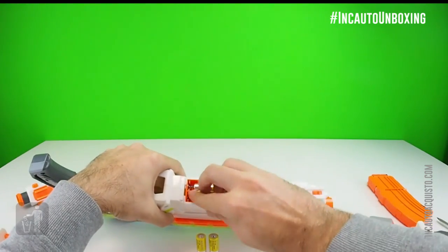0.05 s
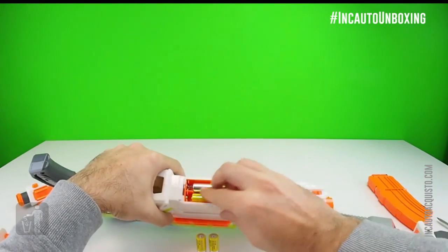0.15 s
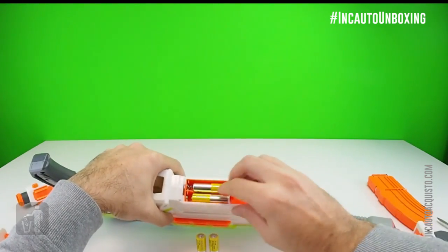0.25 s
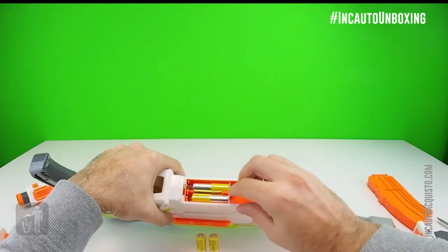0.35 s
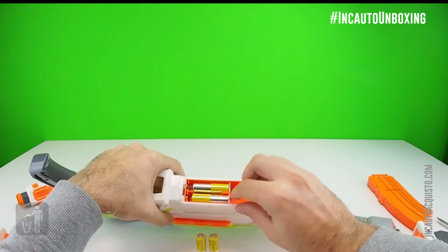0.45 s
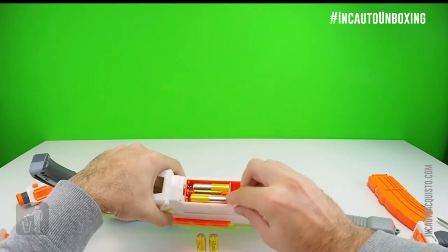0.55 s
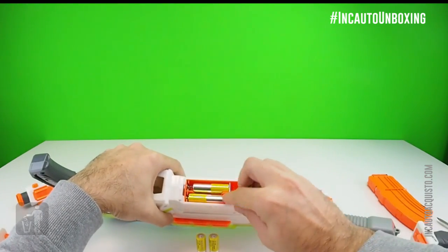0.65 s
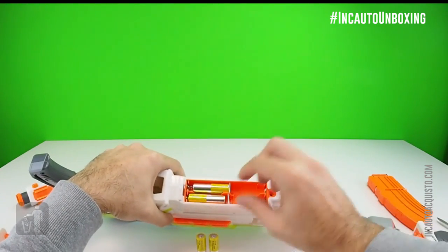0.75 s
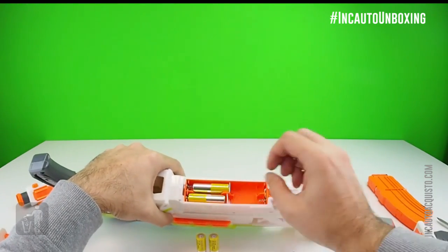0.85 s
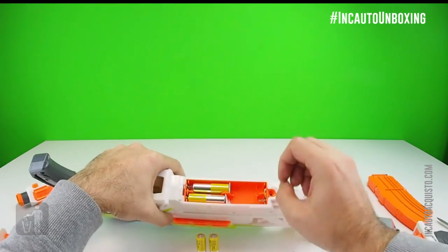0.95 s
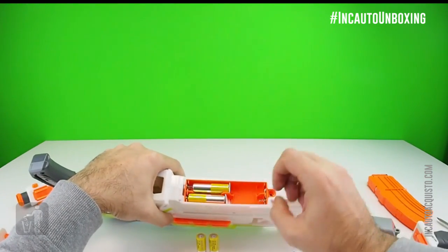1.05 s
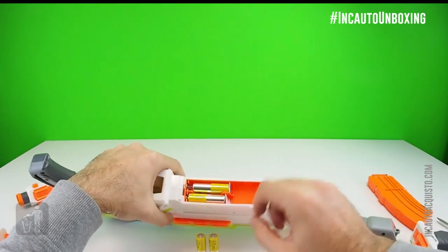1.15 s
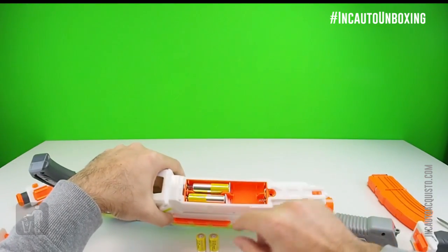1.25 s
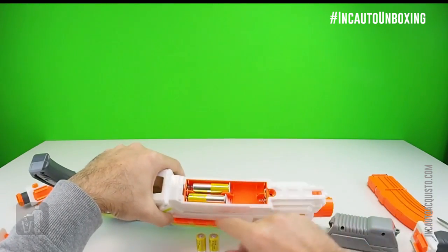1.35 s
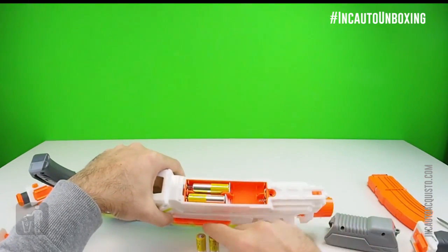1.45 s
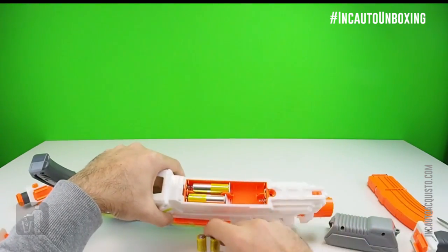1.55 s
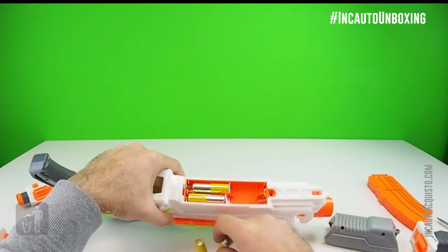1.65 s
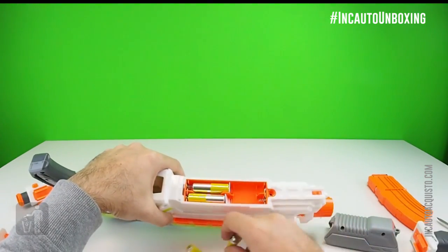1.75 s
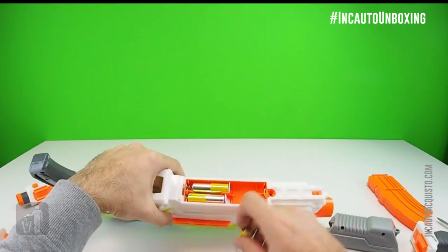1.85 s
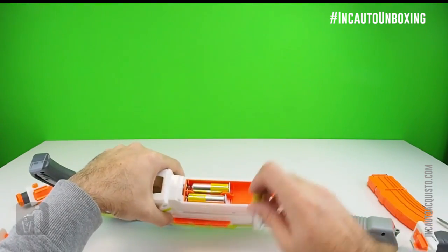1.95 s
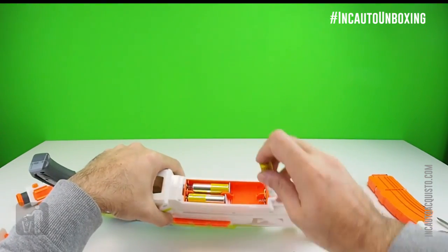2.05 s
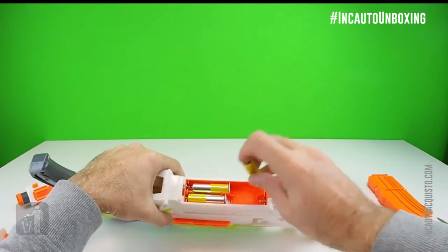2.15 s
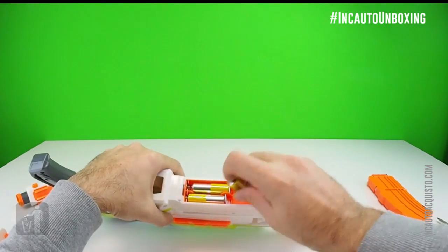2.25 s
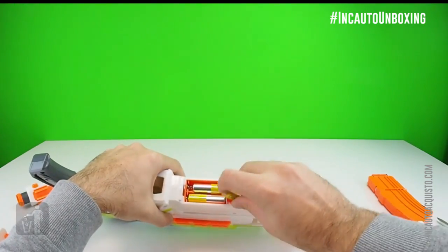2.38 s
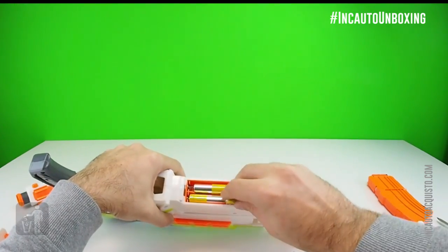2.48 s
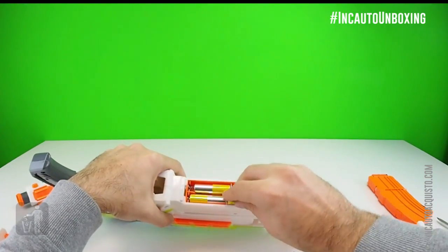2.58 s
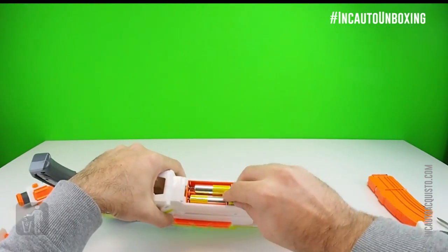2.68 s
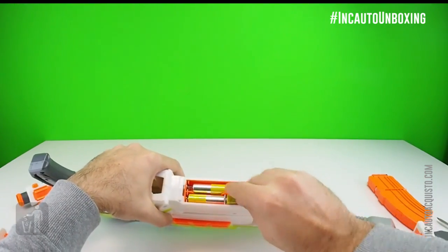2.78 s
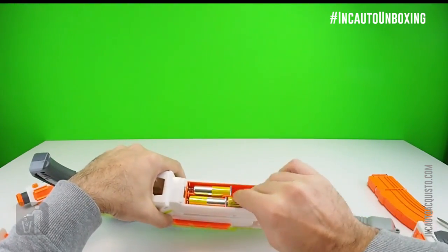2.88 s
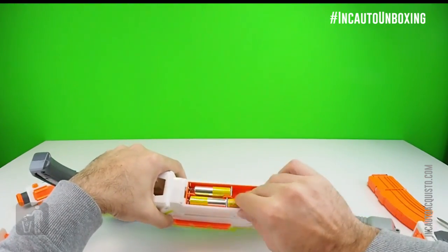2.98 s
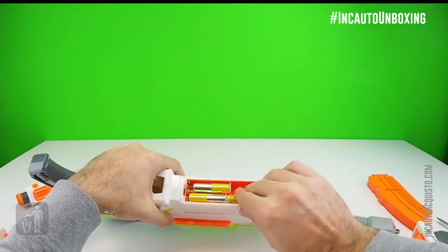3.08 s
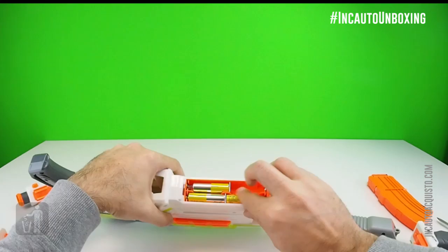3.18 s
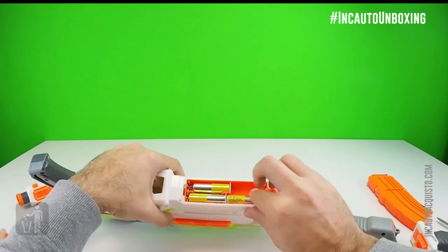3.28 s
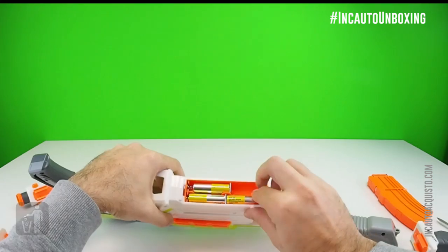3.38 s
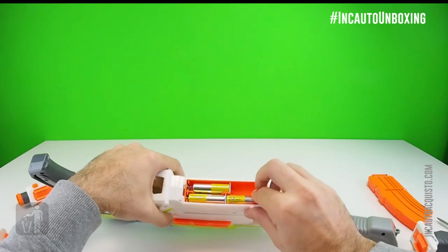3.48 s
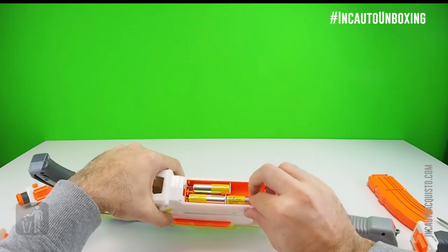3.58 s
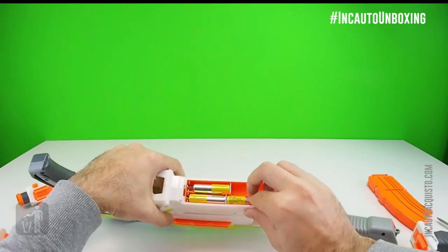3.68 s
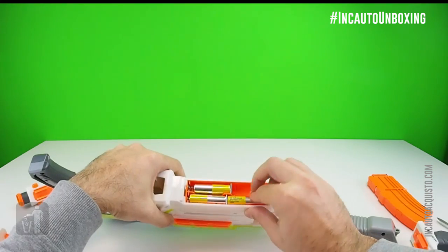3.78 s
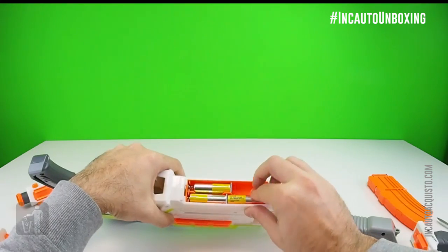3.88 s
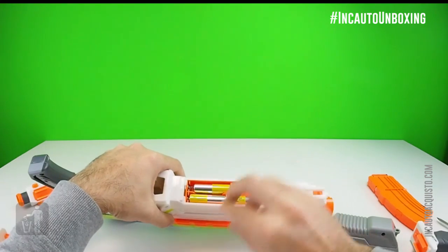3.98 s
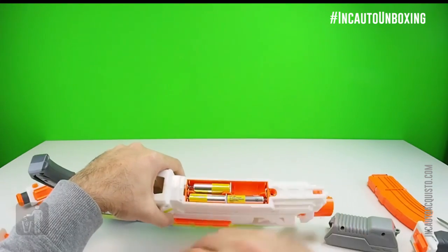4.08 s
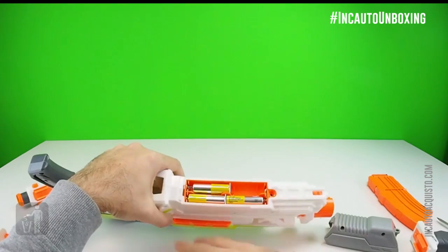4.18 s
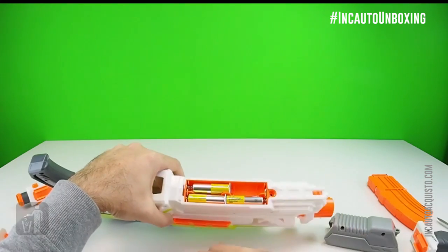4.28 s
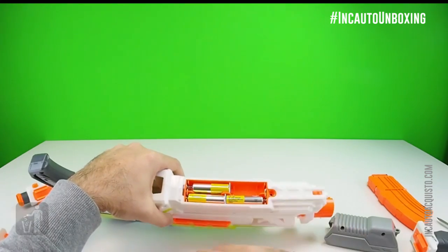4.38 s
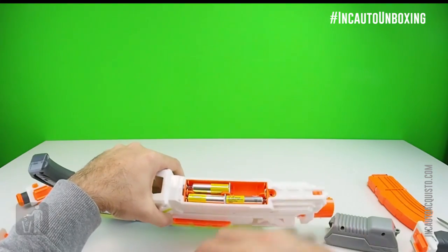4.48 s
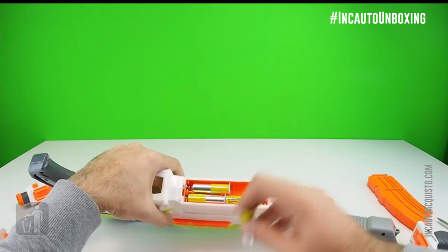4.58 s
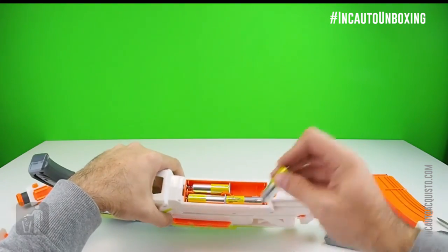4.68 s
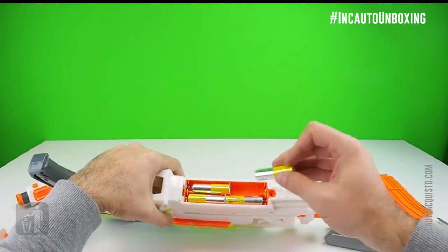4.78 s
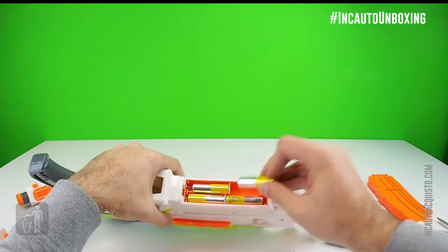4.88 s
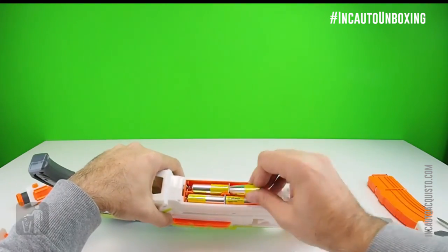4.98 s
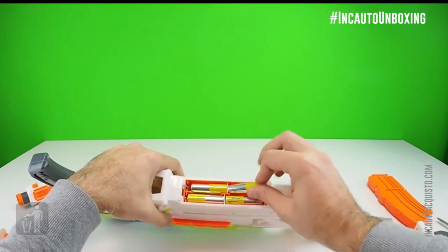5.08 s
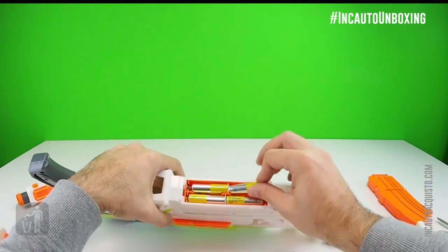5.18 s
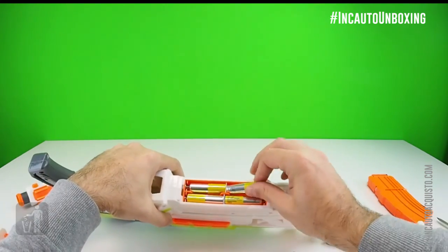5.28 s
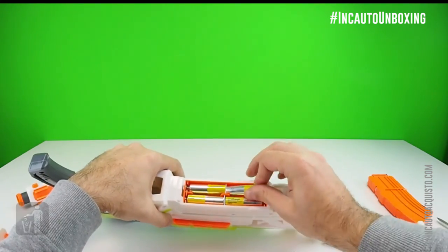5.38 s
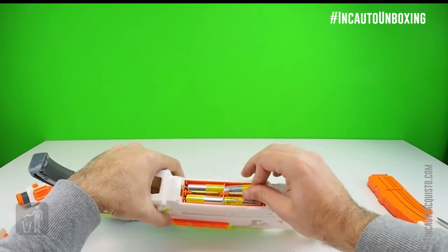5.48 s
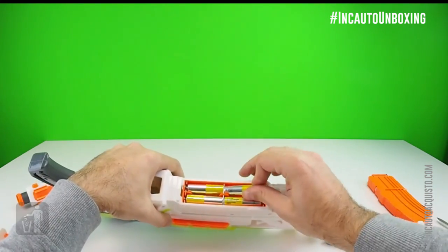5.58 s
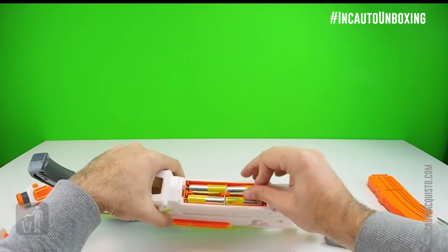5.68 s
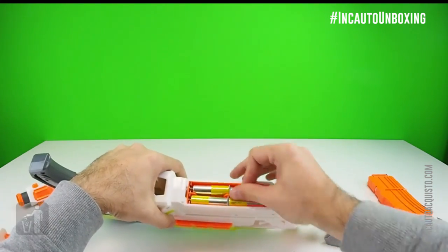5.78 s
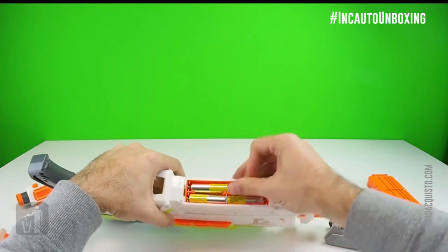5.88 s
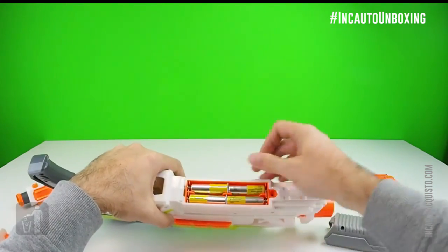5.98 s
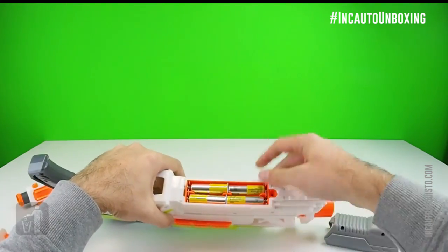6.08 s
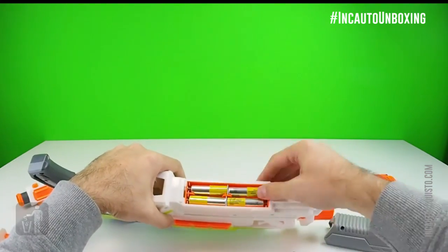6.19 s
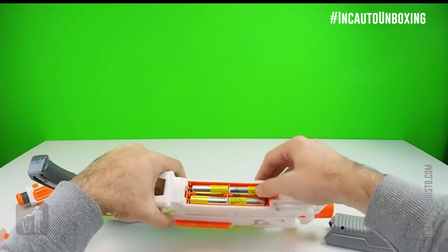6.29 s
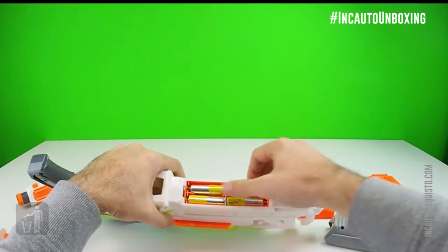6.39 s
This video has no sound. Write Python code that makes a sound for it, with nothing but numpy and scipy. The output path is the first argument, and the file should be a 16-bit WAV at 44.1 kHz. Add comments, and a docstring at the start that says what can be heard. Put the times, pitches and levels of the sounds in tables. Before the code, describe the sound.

Dry plastic clicks and clacks as batteries are pushed home against springs; one topples on the tabletop and bounces rapidly, over faint hiss.

```python
"""Ticks and knocks of batteries in a hollow plastic toy blaster are heard first, over a quiet hiss.
Scrapes are uneven friction noise; knocks and snaps ring damped shell modes, and each snap adds a coil spring.
Metal caps flick a contact plate; one battery topples on the table and bounces at shrinking intervals.
Hand bumps, drags and a brushing sleeve are shaped noise; a small room answers with a decaying diffuse tail."""
import sys
import numpy as np
from scipy import signal
from scipy.fft import rfft, irfft, next_fast_len
from scipy.io import wavfile

SR = 44100
rng = np.random.default_rng(int(sys.argv[2]) if len(sys.argv) > 2 else 0)


def inscribe(sig):
    """Save sig as 16-bit PCM at rate SR to the path in sys.argv[1].

    A 1-D sig is mono; a 2-D sig holds one channel per row.
    Samples are clipped to [-1, 1] before scaling.
    """
    pcm = np.round(np.clip(np.atleast_2d(sig).T, -1, 1) * 32767)
    wavfile.write(sys.argv[1], SR, pcm.astype(np.int16))


N = 284004
AGE = np.arange(SR // 3) / SR  # time since the start of a sound (s)


def amp(db):
    """Level law: decibels to amplitude gain."""
    return 10 ** (np.asarray(db) / 20)


def unit(x):
    """Power normalisation: scale to rms 1."""
    return x / np.sqrt(np.mean(x ** 2) + 1e-20)


def early(x):
    """Onset normalisation: scale a blow to rms 1 over its first hundredth of a second."""
    return x / np.sqrt(np.mean(x[:, :SR // 100] ** 2) + 1e-20)


def along(points, hz):
    """Logarithmic frequency scale: interpolate (Hz, value) points along it."""
    point_hz, values = np.transpose(points)
    return np.interp(np.log(hz + 1), np.log(point_hz), values)


def fade(t60):
    """Exponential damping: a fall of 60 dB in t60 seconds."""
    return np.exp(-np.log(1000) * AGE / t60)


def add(track, s, sound):
    """Superposition: mix a sound into a track at time s."""
    part = track[:, max(round(s * SR), 0):][:, :sound.shape[1]]
    part += sound[:, :part.shape[1]]


def coloured(x, spectrum):
    """Minimum-phase filtering: a causal filter with the gain of (Hz, dB) points."""
    size = 2 * next_fast_len(x.shape[-1] // 2 + 2048)
    log_gain = np.log(amp(along(spectrum, np.fft.rfftfreq(size, 1 / SR))))
    # folding the cepstrum onto positive times makes the filter causal
    cepstrum = irfft(log_gain)
    cepstrum[1:size // 2] *= 2
    cepstrum[size // 2 + 1:] = 0
    return irfft(rfft(x, size) * np.exp(rfft(cepstrum)), size)[..., :x.shape[-1]]


def noise(size, width):
    """Mid-side stereo: white noise whose width depends on frequency."""
    turn = np.arctan(amp(along(width, np.fft.rfftfreq(size, 1 / SR))))
    shares = [np.cos(turn), np.sin(turn)]
    mid, side = irfft(rfft(rng.standard_normal((2, size))) * shares, size)
    return np.array([mid + side, mid - side])


# stereo width of the contacts: frequency_hz, side_minus_mid_db
CONTACT_WIDTH = [(100, -23), (400, -27), (1200, -7), (2500, -9.5), (4500, -4.5), (12000, -0.5)]
SCATTER_DB = 2.5  # spread of the mode strengths from blow to blow


def ring(modes, spot_hz=None, spot_db=8, spot_width=.09):
    """Modal superposition: damped modes at new strengths; high ones reach the ears out of step."""
    hz, db, t60 = np.transpose(modes)[:, :, None]
    db = db + SCATTER_DB * rng.standard_normal(hz.shape)
    if spot_hz:
        # the struck spot favours nearby modes; the width is in log frequency
        db = db + spot_db * np.exp(-(np.log(hz / spot_hz) / spot_width) ** 2)
    polarity = rng.choice([-1, 1], hz.shape)
    skew = np.arctan(amp(along(CONTACT_WIDTH, hz))) * rng.choice([-1, 1], hz.shape)
    swing = polarity * amp(db) * fade(t60)
    phase = 2 * np.pi * hz * AGE
    return np.array([(swing * np.sin(phase + ear * skew)).sum(0) for ear in (1, -1)])


def wash(spectrum, crack_t60, body_t60, body_db, bright_t60):
    """High modal density: a brief crack, then noise for crowded modes whose treble dies first."""
    crack = noise(len(AGE), CONTACT_WIDTH) * fade(crack_t60)
    body = noise(len(AGE), CONTACT_WIDTH)
    dull = signal.sosfilt(signal.butter(2, 2000, fs=SR, output="sos"), body)
    bright = signal.sosfilt(signal.butter(2, 2000, "high", fs=SR, output="sos"), body)
    # subtracting keeps the two halves in phase where they cross
    decaying = dull * fade(body_t60) - bright * fade(bright_t60)
    return early(coloured(crack + amp(body_db) * decaying, spectrum))


# frequency registers of a blow, from knock and clack to click and tick: low_hz, high_hz
REGISTERS_HZ = [(30, 750), (750, 2300), (2300, 6000), (6000, 15500)]


def voiced(blow, levels_db):
    """Spectral balance: each register of a blow is set to its own onset level."""
    out = 0
    for edges, db in zip(REGISTERS_HZ, levels_db):
        band_filter = signal.butter(N=4, Wn=edges, btype="band", fs=SR, output="sos")
        out = out + amp(db) * early(signal.sosfilt(band_filter, blow))
    return out


# spectrum of the quiet hiss: frequency_hz, relative_level_db (per Hz)
HISS_SPECTRUM = [(25, -4), (95, 0.5), (250, -1.5), (700, -7.5), (1150, -5), (1400, -10), (1650, -5.5),
                 (2200, -16), (3200, -12.5), (4800, -15), (6800, -23), (9200, -17), (11000, -21),
                 (15500, -25)]
# stereo width of the hiss: frequency_hz, side_minus_mid_db
HISS_WIDTH = [(60, -7.5), (180, -3), (550, -5.5), (1650, -1.5), (4970, 0.5), (15000, -0.5)]
HISS_DB = -54  # rms level before the ears are made unequal


def room_hiss():
    """Stationary random noise: steady room and microphone hiss, 1 dB stronger on the left."""
    hiss = amp(HISS_DB) * unit(coloured(noise(N, HISS_WIDTH), HISS_SPECTRUM))
    return hiss * amp([[.5], [-.5]])


# reverberation of the small room: frequency_hz, t60_s
ROOM_DECAY = [(150, 0.385), (500, 0.49), (2000, 0.31), (5000, 0.27), (13000, 0.19)]


def room(x):
    """Diffuse reverberation: decaying noise tails answer from the walls, different at each ear."""
    hz, t, z = signal.stft(rng.standard_normal((2, SR // 2)), SR, nperseg=256)
    decay = np.exp(-np.log(1000) * t / along(ROOM_DECAY, hz)[:, None])
    tail = signal.istft(z * decay, SR, nperseg=256)[1]
    # the answer starts 5 ms after the direct sound
    tail = np.pad(tail / np.linalg.norm(tail[0]), ((0, 0), (SR // 200, 0)))
    mid, spread = signal.fftconvolve(x, tail, axes=1)[:, :N]
    # long waves arrive alike at the two close capsules
    side = coloured(spread, [(300, -23.5), (1000, -6.5), (3000, 1.5)])
    return np.array([mid + side, mid - side]) / np.sqrt(2)


# soft bumps of a hand through the table: start_s, peak_db (direct sound)
HAND_BUMPS = [(3.084, -43), (4.295, -39.5), (4.345, -60)]


def bumps():
    """Low-frequency excitation: a soft hand makes the table boom briefly."""
    out = np.zeros((2, N))
    for s, db in HAND_BUMPS:
        push = noise(len(AGE), CONTACT_WIDTH) * fade(0.21) * (1 - fade(0.022))
        boom = coloured(push, [(20, -27), (60, 7.0), (110, -12.0), (230, -11.5), (400, -26), (1500, -49.0)])
        add(out, s, amp(db) * boom / np.abs(boom).max())
    return out


def friction(strokes, spectrum, grain_db):
    """Stick-slip friction: tiny slips, made uneven by grain_db, swell and fade under each stroke."""
    out = np.zeros((2, N))
    for s, length, db in strokes:
        # each slip strength lasts 64 samples
        slip_sizes = np.repeat(rng.standard_normal(len(AGE)), repeats=64)[:len(AGE)]
        slips = unit(amp(grain_db * slip_sizes))
        stroke = np.sin(np.pi * np.minimum(AGE / length, 1))
        rubbing = unit(coloured(noise(len(AGE), CONTACT_WIDTH) * slips, spectrum))
        add(out, s, amp(db) * stroke * rubbing)
    return out


# sleeve brushing the table: start_s, length_s, level_db (before the swell)
SLEEVE_STROKES = [(1.55, 0.15, -59), (1.68, 0.06, -52), (1.815, 0.062, -53)]
# spectrum of the sleeve: frequency_hz, relative_level_db (per Hz)
SLEEVE_SPECTRUM = [(40, -4.5), (150, 4), (270, 10), (450, 4), (1500, -6), (6000, -42)]


def sleeve_brushes():
    """Soft friction: a sleeve on the table gives noise with little treble."""
    return friction(SLEEVE_STROKES, SLEEVE_SPECTRUM, grain_db=3)


# battery dragged over the table: start_s, length_s, level_db (before the swell)
DRAG_STROKES = [(1.825, 0.041, -51), (4.295, 0.039, -48), (4.332, 0.059, -37.5), (4.37, 0.043, -48)]
# spectrum of the drags: frequency_hz, relative_level_db (per Hz)
DRAG_SPECTRUM = [(50, -32), (450, -2.5), (800, -4.5), (1030, 6), (1250, -9.5), (1800, -4), (2400, -16.5),
                 (4200, -15), (7000, -33.5), (11000, -19.5), (16000, -31)]


def drags():
    """Sliding friction: a battery dragged over the table gives smooth noise of even slips."""
    return friction(DRAG_STROKES, DRAG_SPECTRUM, grain_db=0)


# modes of the battery and table top: frequency_hz, relative_level_db, t60_s
TABLE_MODES = [(237, -37, 0.11), (593, -12.5, 0.22), (1062, 0, 0.141), (1314, -9, 0.24), (1644, 4, 0.15),
               (1770, 0, 0.22), (2326, -2, 0.22), (3020, 3, 0.25), (3210, -8, 0.13), (3426, -7, 0.128),
               (3500, -11.5, .15), (3590, 7, 0.11), (4110, -8.5, 0.13)]
# spectrum of the crowded table modes: frequency_hz, relative_level_db (per Hz)
TABLE_WASH = [(40, -25), (250, -11.5), (750, -14), (1050, 1.5), (1800, 4.5), (2300, 1), (3500, 13.5),
              (4900, 3), (6200, -17), (9000, -23), (12500, -18), (16000, -34)]


def table_blow(db, tone, crack_t60, ring_db, other_end=0):
    """Impact excitation: a battery lands on the table top and both ring."""
    modes = amp(ring_db) * early(ring(TABLE_MODES))
    crowd = wash(TABLE_WASH, crack_t60, body_t60=0.15, body_db=ring_db + 1, bright_t60=0.054)
    blow = coloured(modes + crowd + other_end, [(40, -22), (200, 3)])
    return voiced(blow, db + np.array(tone))


# register balance of the first blow: knock_db, clack_db, click_db, tick_db
TOPPLE_TONE = (-9.5, -0.5, 0.5, -3.5)
# register balance of the rebounds: knock_db, clack_db, click_db, tick_db
REBOUND_TONE = (-9.5, -1.5, -1, -10)
# strength of each rebound in turn: level_db
REBOUNDS_DB = (-21.5, -25, -24, -33.5)
# first blow: time (s), strength (dB); first flight (s), each flight over the one before
TOPPLE_S, TOPPLE_DB, FLIGHT_S, SHRINK = 1.8853, -15.5, 0.0603, 0.66


def bounces():
    """Inelastic rebound: the toppled battery hits hard and clean, then chatters ever faster."""
    out = np.zeros((2, N))
    add(out, TOPPLE_S, table_blow(TOPPLE_DB, TOPPLE_TONE, crack_t60=0.0035, ring_db=-26.5))
    # the first blow also shoves the table top: one short push of air
    u = AGE / 0.00011
    add(out, TOPPLE_S, amp(1.0) * np.array([u * np.exp(-u)] * 2))
    flights = FLIGHT_S * SHRINK ** np.arange(len(REBOUNDS_DB))
    for s, db in zip(TOPPLE_S + np.cumsum(flights), REBOUNDS_DB):
        # on the rebounds the other end lands a moment later
        other_end = np.zeros((2, len(AGE)))
        second = wash(TABLE_WASH, crack_t60=0.0122, body_t60=0.33, body_db=-13.5, bright_t60=0.2)
        add(other_end, rng.uniform(.003, 0.0049), amp(-2) * second)
        add(out, s, table_blow(db, REBOUND_TONE, crack_t60=0.027, ring_db=-10, other_end=other_end))
    return out


# battery rubbing along the shell: start_s, length_s, level_db (before the swell)
SCRAPE_STROKES = [(.14, 0.064, -60), (2.44, 0.042, -30), (2.489, 0.053, -39), (2.617, 0.092, -54),
                  (2.82, 0.078, -54), (2.998, 0.092, -58), (5.018, 0.084, -38), (5.918, 0.073, -54.5),
                  (6.195, 0.04, -80)]
# spectrum of the scrapes: frequency_hz, relative_level_db (per Hz)
SCRAPE_SPECTRUM = [(60, -36.5), (450, 2.5), (1000, 0), (1350, -24), (1900, -3.5), (3100, 5), (4300, -21),
                   (4900, -10), (5700, -21), (13000, -20.5), (16000, -38)]


def scrapes():
    """Rough friction: a battery rubbing along the shell slips very unevenly."""
    return friction(SCRAPE_STROKES, SCRAPE_SPECTRUM, grain_db=8.5)


# modes of the plastic shell: frequency_hz, relative_level_db, t60_s
SHELL_MODES = [(364, -32, 0.27), (432.7, -4, 0.13), (510, -2.5, 0.12), (555.7, -3, 0.1), (592, -0.5, 0.083),
               (656, -7.5, 0.12), (922, -3.5, 0.12), (1032, -0.5, 0.057), (1626, 10.5, 0.029),
               (1800, 4, 0.053), (1760, 9, 0.013), (2680, -19, 0.022), (3040, -24, .045), (3000, -4, 0.08),
               (3950, 0.5, 0.041), (4080, 6.5, 0.036), (4440, 9.5, 0.027), (4820, 2.5, 0.044),
               (6360, -31, .04)]
# spectrum of the crowded shell modes: frequency_hz, relative_level_db (per Hz)
SHELL_WASH = [(40, 12), (200, -31.5), (320, -7.5), (480, 2.5), (750, -8), (1000, -1), (1350, -10.5),
              (1800, -2), (2300, -8), (3500, -0.5), (4900, -10.5), (6500, -15), (12800, -14), (16000, -26)]
# gain of the four registers, low to high, with hardness: gain_db (per dB of hardness)
HARDNESS_SHARE = (-0.71, -0.14, 0.39, 0.52)


def strike(db, hardness_db, spot_hz, tone, ring_db=-1.0):
    """Contact stiffness: a touch cracks and rings the hollow shell, brighter when harder."""
    levels_db = db + np.array(tone) + hardness_db * np.array(HARDNESS_SHARE)
    # a hard snap is mostly crack; a dull knock leaves more ringing
    body_db = ring_db - 0.41 * np.clip(max(levels_db[1:3]) - levels_db[0], 0, 9)
    modes = early(ring(SHELL_MODES, spot_hz=spot_hz, spot_db=8.0, spot_width=0.088))
    crowd = wash(SHELL_WASH, crack_t60=0.015, body_t60=0.078, body_db=body_db - 5, bright_t60=0.064)
    # a small shell radiates little bass
    blow = coloured(amp(body_db) * modes + crowd, [(40, -23.0), (240, 8)])
    return voiced(blow, levels_db)


# knocks on the shell: start_s, level_db, hardness_db (tilts the balance to treble), spot_hz (favoured)
SHELL_KNOCKS = [(0.0785, -32.5, -5, 468), (0.1021, -39, -5.5, 484), (0.183, -46, -2, 415),
                (0.7235, -34, -6, 433), (2.3045, -41, -0.5, 494), (2.3454, -26.5, -2.5, 605),
                (2.3734, -39.5, -1.5, 680), (2.4695, -31.5, -6, 630), (2.7726, -57.5, -17, 545),
                (2.813, -43, -5.5, 500), (3.099, -53.5, -26, 544), (3.1576, -45.5, 16.5, 655),
                (3.208, -57, 21.5, 480), (3.249, -57.5, -14, 550), (3.5183, -49, 2.5, 670),
                (3.754, -64, -18, 400), (3.9596, -54, 5.5, 567), (3.977, -43, -7, 585),
                (5.035, -38.5, -7, 437), (5.0585, -30, -7.5, 486), (5.1317, -26, -1.5, 590),
                (5.2842, -56.5, 6, 516), (5.384, -53.5, 4, 510), (5.4264, -49.5, -8.5, 500),
                (5.4869, -62, -21.5, 530), (5.6995, -45.5, -11.5, 503), (6.2, -54, 17.5, 400),
                (6.2821, -58, -6.5, 494), (6.3425, -56, -1.5, 527)]
# register balance of a knock: knock_db, clack_db, click_db, tick_db
KNOCK_TONE = (-0.5, -0.5, -1.5, -7.5)


def knocks():
    """Impact on a thin shell: batteries knock on the compartment walls as they are steered in."""
    out = np.zeros((2, N))
    for s, db, hardness_db, spot_hz in SHELL_KNOCKS:
        add(out, s, strike(db, hardness_db, spot_hz, KNOCK_TONE))
    return out


# a catch: level at 0 dB of rubbing (dB), its rise per dB of rubbing, mean hardness (dB), spot (Hz)
CATCH_DB, CATCH_GROWS, CATCH_HARDNESS_DB, CATCH_SPOT_HZ = -42.5, 0.24, -7, 460


def catches(count=2):
    """Stick-slip arrest: a scraping battery catches on the wall, at chance in each equal share."""
    out = np.zeros((2, N))
    for s, length, db in SCRAPE_STROKES:
        for share in (np.arange(count) + rng.random(count)) / count:
            hardness_db = CATCH_HARDNESS_DB + 4 * rng.standard_normal()
            catch = strike(CATCH_DB + CATCH_GROWS * db, hardness_db, CATCH_SPOT_HZ, KNOCK_TONE)
            add(out, s + share * length, catch)
    return out


# battery cap flicking a metal contact plate: start_s, level_db, ping_db
PLATE_FLICKS = [(2.439, -46.5, -53), (2.475, -28.5, -40), (2.5254, -32, -58), (5.0148, -26, -59)]
# modes of the contact plate: frequency_hz, relative_level_db, t60_s
PLATE_MODES = [(5000, 4, 0.09), (5600, -16, 0.067)]
# register balance of a flick: knock_db, clack_db, click_db, tick_db
FLICK_TONE = (-0.5, -7.5, 1, -14.5)
FLICK_SPOT_HZ = 427  # shell resonance next to the plate


def flicks():
    """Coupled resonators: a cap clicks on a plate, which pings and passes the blow to the shell."""
    out = np.zeros((2, N))
    for s, db, ping_db in PLATE_FLICKS:
        ping = amp(ping_db) * early(ring(PLATE_MODES))
        add(out, s, strike(db, 0, FLICK_SPOT_HZ, FLICK_TONE) + ping)
    return out


# spectrum of the coil's sizzle: frequency_hz, relative_level_db (per Hz)
COIL_SPECTRUM = [(300, -28), (1000, 8), (1800, -9), (4500, 2), (6500, -7), (12000, -2.5), (16000, -24)]


def spring(hz):
    """Coil resonance: a close cluster of modes and a sizzle, stronger in stiff, high coils."""
    sizzle = early(coloured(noise(len(AGE), CONTACT_WIDTH) * fade(0.71), COIL_SPECTRUM))
    cluster = early(ring([(hz * 0.88, -3, .3), (hz, 0, .36), (hz * 1.3, -3, .3)]))
    return sizzle * np.sqrt(hz / 3000) + amp(-2) * cluster * np.sqrt(1500 / hz)


# battery snapping home: start_s, level_db, hardness_db, spot_hz, slip_lead_s, spring_db, coil_hz
BATTERY_SNAPS = [(0.631, -22, 0, 596, 0.017, -46, 1046), (2.9761, -23, -1.5, 570, 0.017, -56, 1820),
                 (5.7544, -21, 4.5, 470, 0.0048, -40, 3240)]
# register balance of a snap: knock_db, clack_db, click_db, tick_db
SNAP_TONE = (-3, 1, -1.5, -6)
SLIP_DB = -20.5  # strength of the slip off the rim, against the snap
# the coil takes the blow and colours it: lift at its main pitch (dB), reach to each side (frequency ratio)
COIL_LIFT_DB, COIL_REACH = 5, 1.31


def snaps():
    """Impulsive loading: a battery slips off the rim, slams home and sets the spring ringing."""
    out = np.zeros((2, N))
    for s, db, hardness_db, spot_hz, lead_s, spring_db, coil_hz in BATTERY_SNAPS:
        add(out, s - lead_s, strike(db + SLIP_DB, 0, spot_hz, KNOCK_TONE))
        slam = strike(db, hardness_db, spot_hz, SNAP_TONE, ring_db=-4)
        slam = coloured(slam, [(coil_hz / COIL_REACH, 0), (coil_hz, COIL_LIFT_DB), (coil_hz * COIL_REACH, 0)])
        add(out, s, slam + amp(spring_db) * spring(coil_hz))
    return out


# colour difference between the ears: frequency_hz, left_minus_right_db
EAR_LEAN = [(400, 1.1), (1500, 0), (4500, -1), (9000, 4.5), (13000, 4.5)]


def scene():
    """Superposition: direct and reverberant sound of blaster and table, over the hiss."""
    table = sleeve_brushes() + drags() + bumps() + bounces()
    blaster = scrapes() + catches() + flicks() + knocks() + snaps()
    sound = blaster + amp(-12.0) * room(blaster) + table + amp(-13.0) * room(table)
    # each ear has its own colour
    left = coloured(sound[0], [(hz, db / 2) for hz, db in EAR_LEAN])
    right = coloured(sound[1], [(hz, -db / 2) for hz, db in EAR_LEAN])
    return np.array([left, right]) + room_hiss()


TOP_HZ = 15700  # band limit


def record(dry):
    """Saturation and band limiting: peaks clip at full scale; nothing passes above TOP_HZ."""
    clipped = np.clip(dry, -1, 1)
    return irfft(rfft(clipped) * (np.fft.rfftfreq(N, 1 / SR) < TOP_HZ), N)


dry = scene()
out = record(dry)
inscribe(out)
```